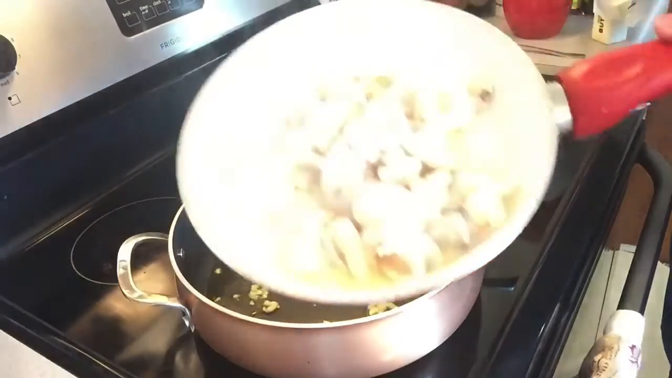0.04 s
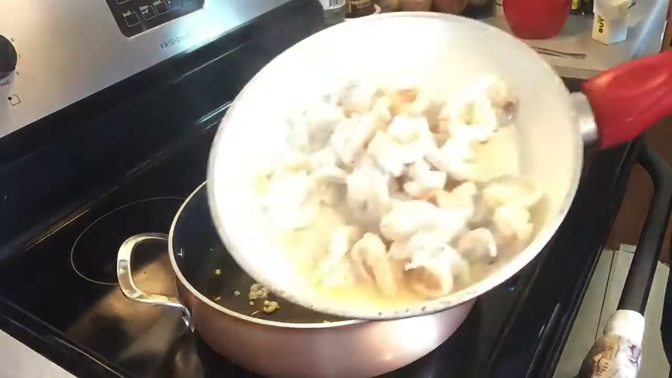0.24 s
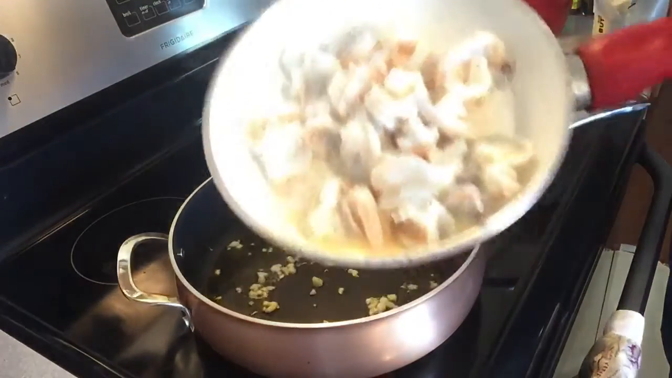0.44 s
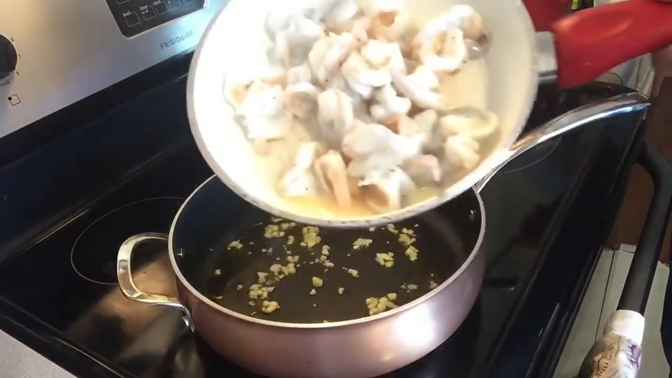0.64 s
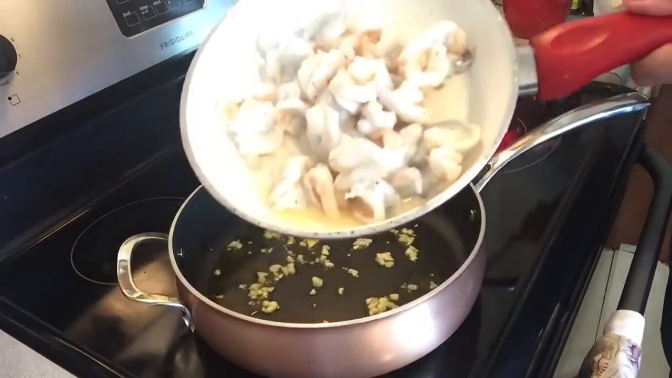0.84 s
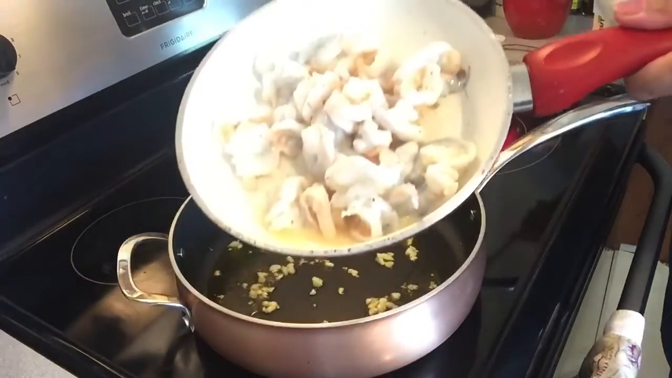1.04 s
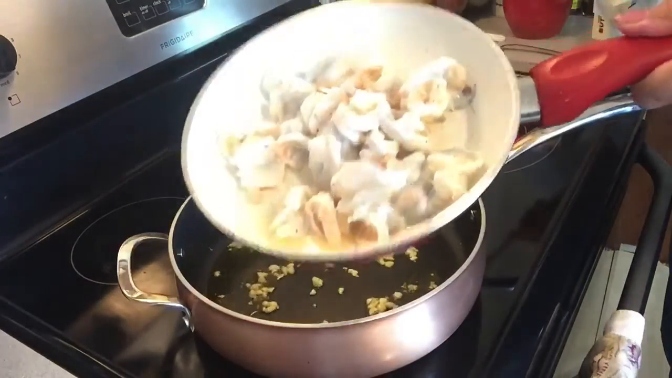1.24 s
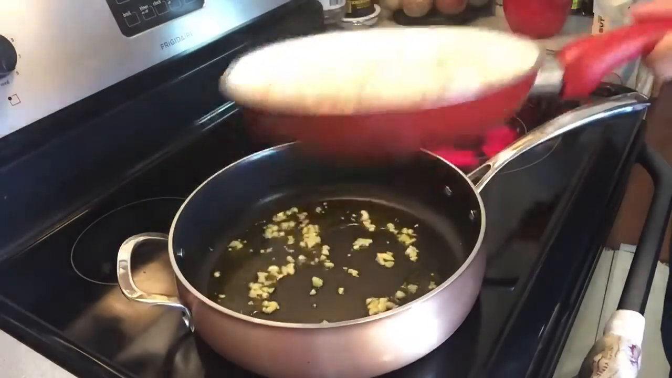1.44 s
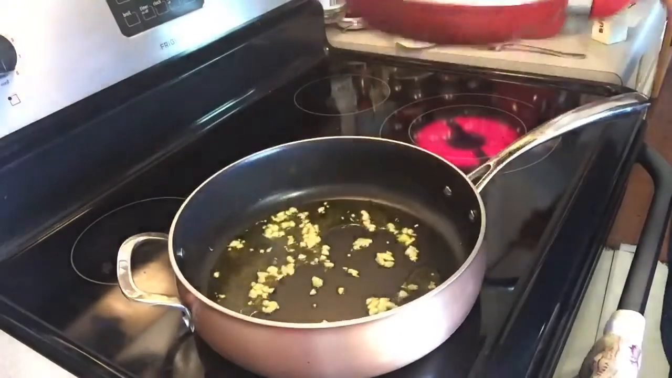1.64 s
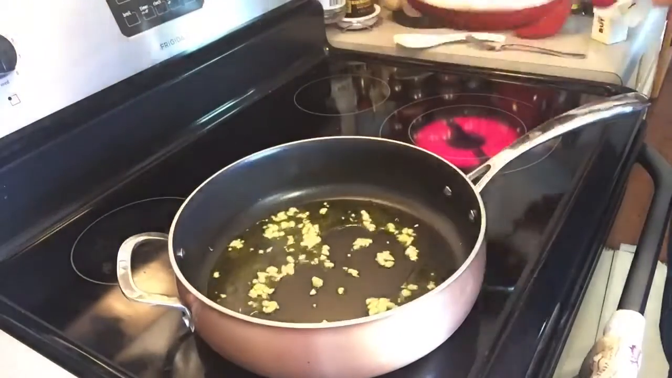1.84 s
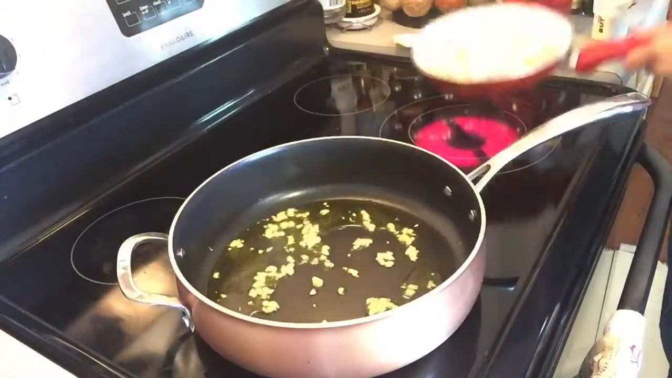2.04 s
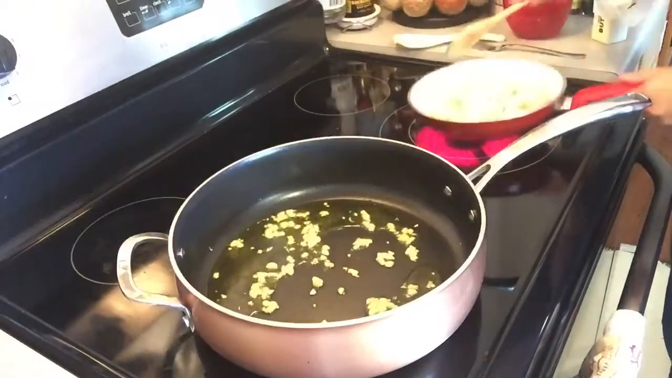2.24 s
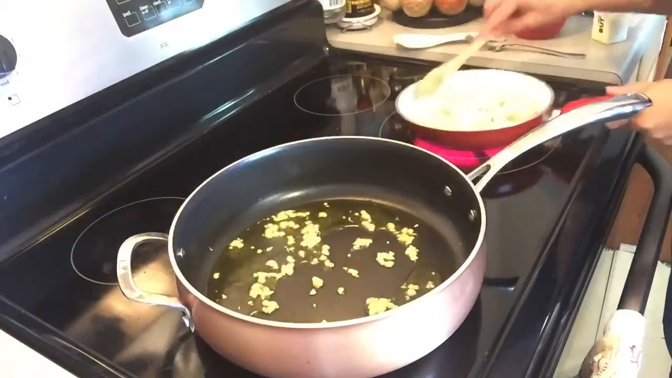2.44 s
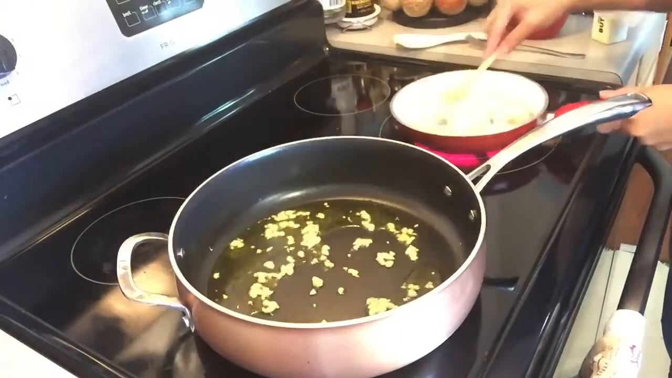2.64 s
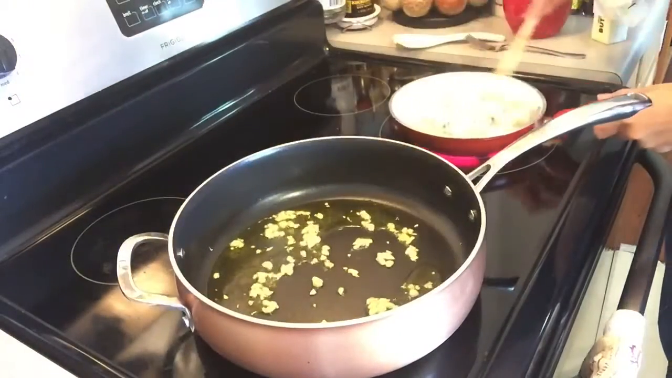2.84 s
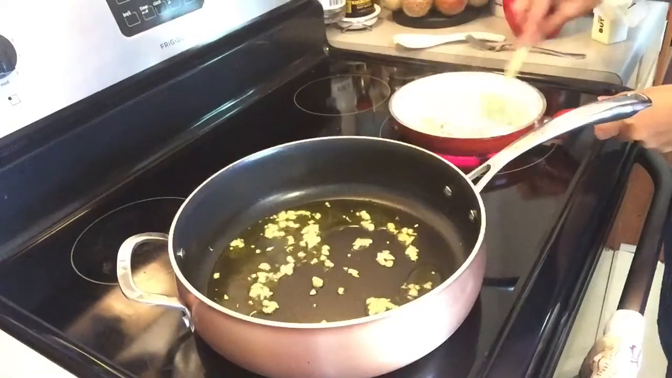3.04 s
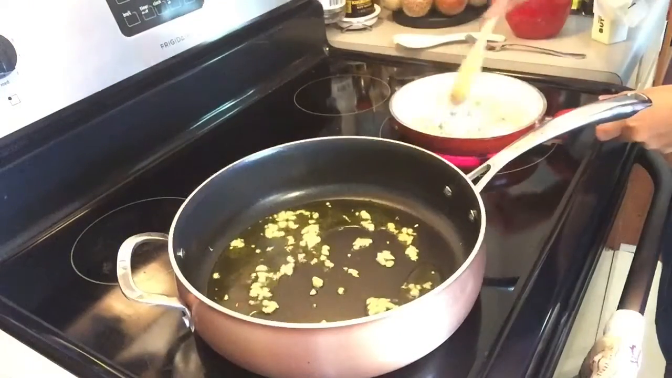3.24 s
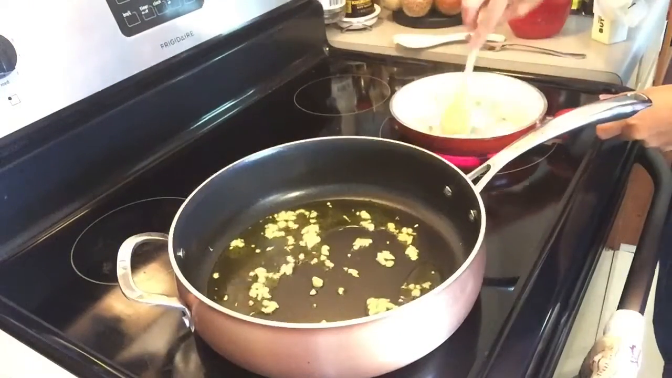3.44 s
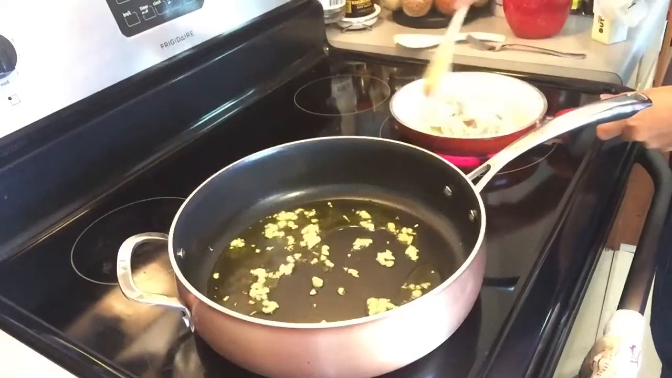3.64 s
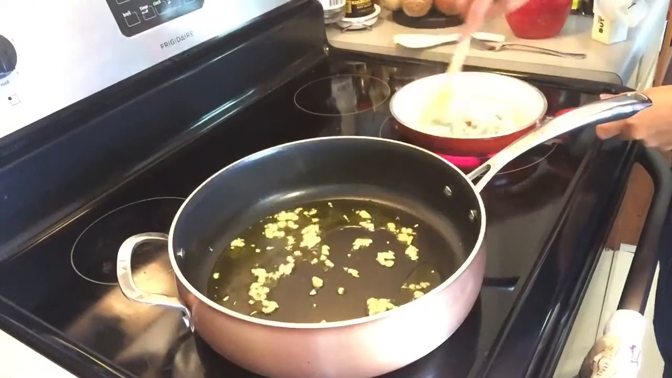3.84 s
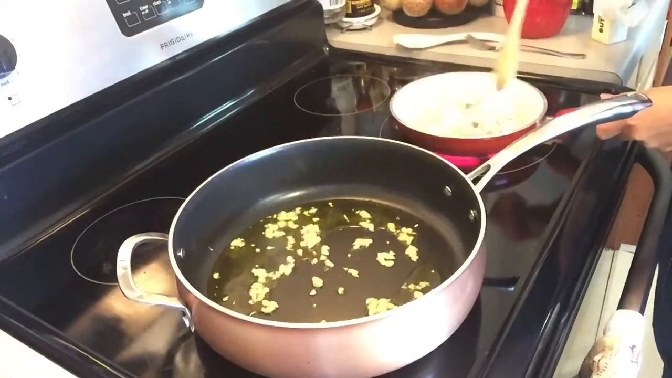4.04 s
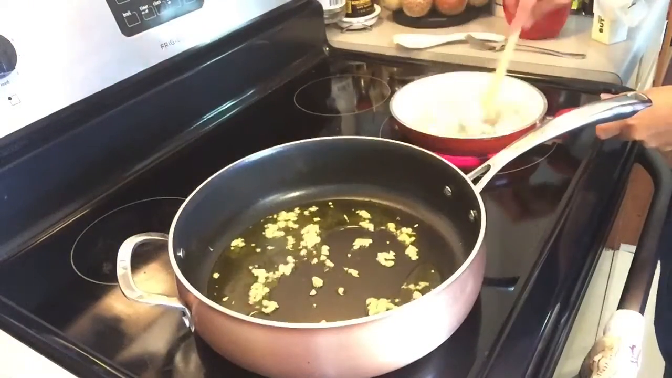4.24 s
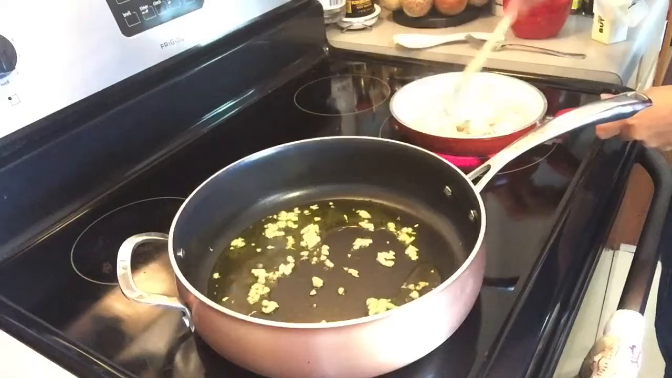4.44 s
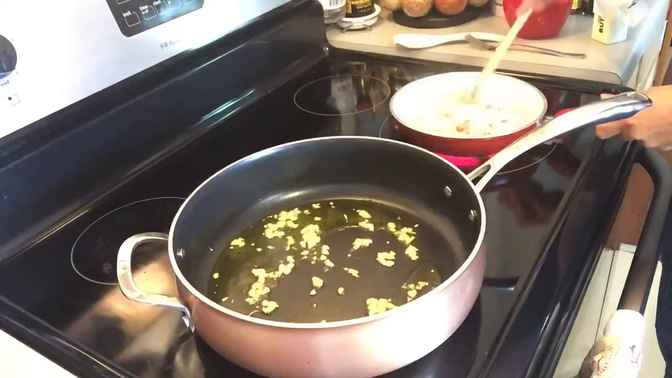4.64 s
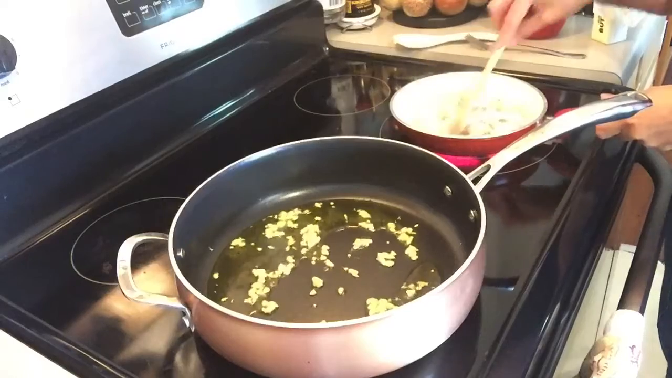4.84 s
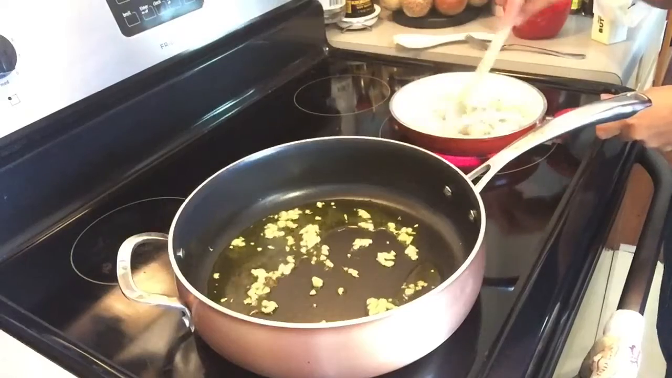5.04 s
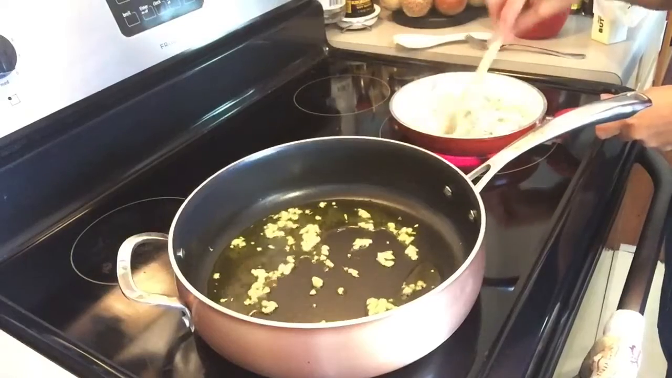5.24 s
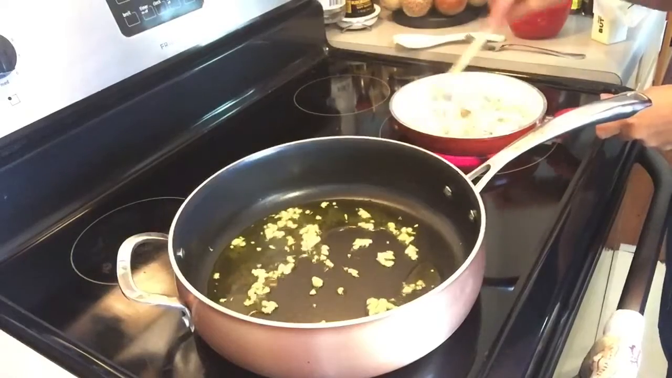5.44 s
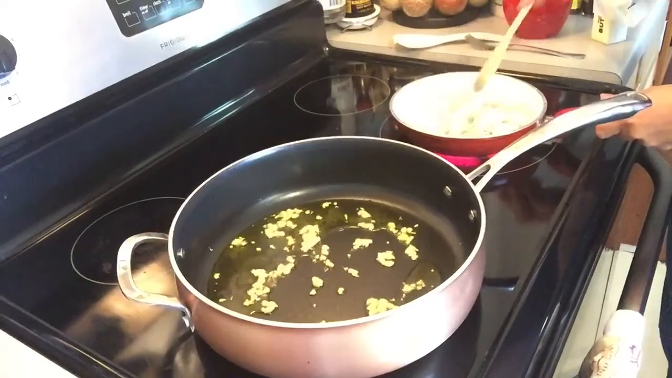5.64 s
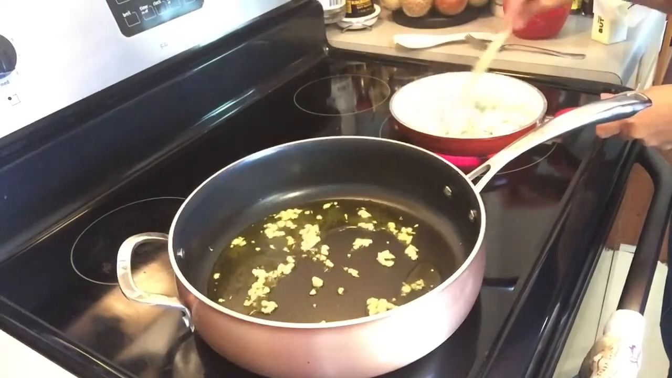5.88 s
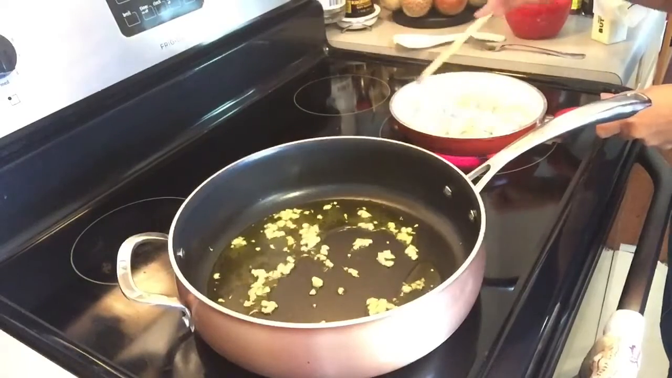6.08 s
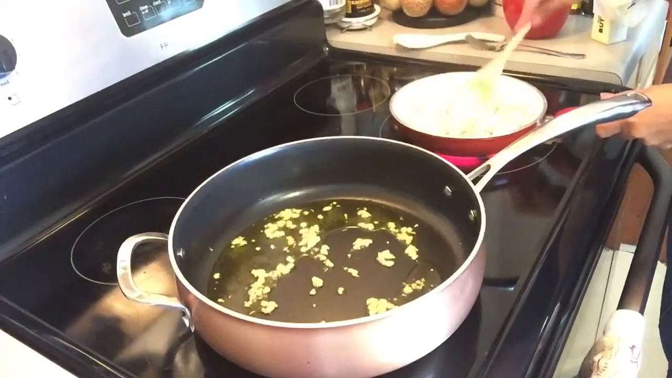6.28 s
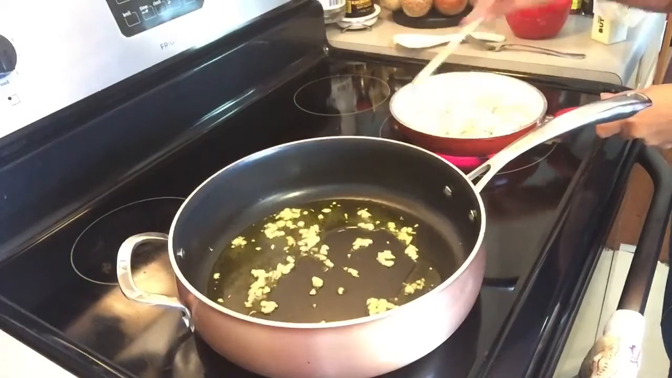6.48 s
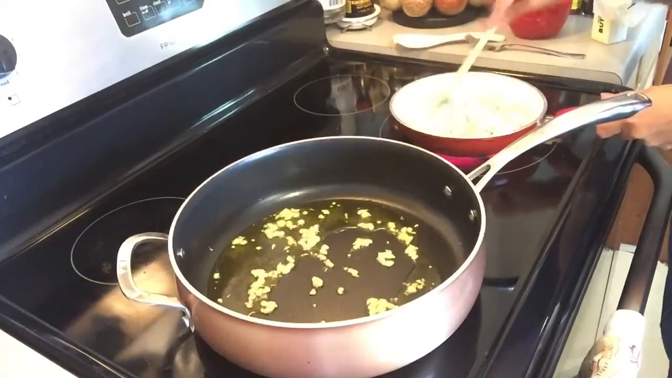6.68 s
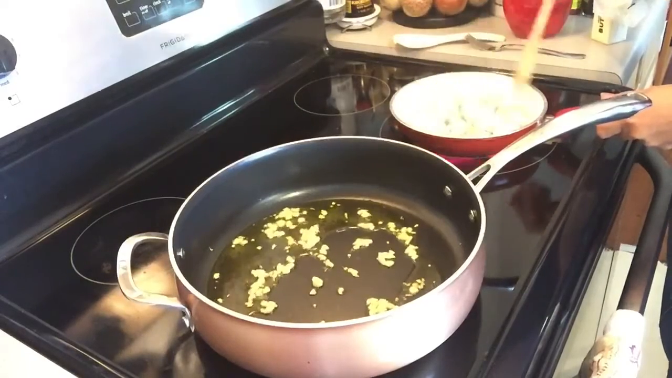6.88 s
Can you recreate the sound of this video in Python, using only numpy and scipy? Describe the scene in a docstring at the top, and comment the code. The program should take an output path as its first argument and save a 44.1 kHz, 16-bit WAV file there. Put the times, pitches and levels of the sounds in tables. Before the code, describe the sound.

Faint oil sizzle in a home kitchen, one loud double clunk of a pan set down, then scattered wooden knocks and soft wet stirring.

```python
"""A small frying pan of shrimp is set down on a glass cooktop and stirred with a wooden spatula.
Each knock excites damped modes of the loaded pan and of the hollow stove top; the kitchen reverberates.
Wet slips rustle as random grains, and garlic sizzles faintly in oil in a nearer pan as shaped noise.
The stove hums as a wavering sine over a soft rush of room noise. One microphone, close by."""
import sys
import numpy as np
from scipy import signal
from scipy.fft import rfft, irfft
from scipy.io import wavfile
from scipy.ndimage import uniform_filter1d

SR = 44100
rng = np.random.default_rng(int(sys.argv[2]) if len(sys.argv) > 2 else 0)


def generate_wav(sig):
    """Save sig (samples, or channels by samples) to the path in sys.argv[1] as 16-bit PCM at SR."""
    pcm = np.round(np.clip(np.atleast_2d(sig).T, -1, 1) * 32767).astype(np.int16)
    wavfile.write(sys.argv[1], SR, pcm)


N = 304863

# modes of the pan, damped by its food: mode_hz, width_hz, relative level_db
PAN_MODES = [(444, 39, 0), (498, 26, 1.5), (664, 46, 4.5), (741, 32, 7), (753, 22, 7.5), (886, 17, 4),
             (1030, 19, -11.5), (1133, 37, 5.5), (1200, 50, -1.5), (1274, 39, -1.5), (1400, 100, 0.5),
             (1488, 15.5, 4), (1564, 34, -4.5), (1710, 57, -1), (1890, 64, -6), (2007, 140, -0.5),
             (2336, 22, 0.5), (2434, 31, 1), (2630, 53, -22), (2835, 78, -4), (2890, 34, -20),
             (3190, 22, -6), (3560, 100, -4), (4120, 74, 2.5), (4590, 68, -4.5), (5400, 68, -11),
             (5480, 62, -1), (6900, 160, 2.5)]


def from_db(db):
    """Decibels to an amplitude ratio."""
    return 10 ** (np.asarray(db) / 20)


def rms_one(x):
    """Normalise the effective (root-mean-square) value to 1."""
    return x / np.sqrt(np.mean(x ** 2) + 1e-20)


def at_hz(points, hz):
    """A table of (hz, value) rows interpolated on a log-frequency axis."""
    points = np.array(points)
    return np.interp(np.log(hz + 1e-3), np.log(points[:, 0]), points[:, 1])


def butter(x, hz, kind, order=2):
    """Butterworth filter: maximally flat passband; its edges are kept between 10 Hz and 0.45 SR."""
    edges = np.clip(hz, 10, .45 * SR)
    return signal.sosfilt(signal.butter(order, edges, kind, fs=SR, output="sos"), x)


def coloured(x, spectrum):
    """Spectral shaping: a steady sound weighted by a (hz, level_db) table; rms 1."""
    gain = from_db(at_hz(spectrum, np.fft.rfftfreq(N, 1 / SR)))
    return rms_one(irfft(rfft(x) * gain, N))


def drift(rate):
    """Slow random fluctuation with rms 1: straight lines between chance values, `rate` of them a second."""
    knots = rng.standard_normal(1000)
    return rms_one(np.interp(np.arange(N) / SR * rate, np.arange(len(knots)), knots))


def swell(middle_s, length_s):
    """Gaussian envelope: a smooth rise and fall of height 1."""
    return np.exp(-(2 * (np.arange(N) / SR - middle_s) / length_s) ** 2)


def resonance(x, hz, width):
    """Damped oscillator: a two-pole resonance with gain 1 at its peak; width in Hz."""
    r = np.exp(-np.pi * width / SR)
    zeros = np.array([1, 0, -1]) * (1 - r * r) / 2
    poles = [1, -2 * r * np.cos(2 * np.pi * hz / SR), r * r]
    return signal.lfilter(zeros, poles, x + 1e-18)


def body(x, modes, spread_db):
    """Modal superposition: parallel modes of alternating sign share each excitation a little differently."""
    chance_db = rng.standard_normal(len(modes)) * spread_db
    total = 0
    for k, (hz, width, db) in enumerate(modes):
        total = total + (-1) ** k * from_db(db + chance_db[k]) * resonance(x, hz, width)
    return total


def burst(t60, rise_s=1e-5, even_hz=45, size=SR * 2 // 3, count=4):
    """High modal density: countless modes or reflections merge into dying noise, even in spectrum, energy 1."""
    t = np.arange(1, size + 1) / SR
    fade = from_db(-60 * t / t60) * (1 - np.exp(-(t / rise_s) ** 2)) + 1e-9
    x = rng.standard_normal(size) * fade
    # level the spectrum and restore the fade by turns
    for _ in range(count):
        spectrum = rfft(x)
        power = uniform_filter1d(np.abs(spectrum) ** 2, max(1, round(even_hz * size / SR)))
        x = irfft(spectrum / np.sqrt(power + 1e-20), size)
        x = fade * x / np.sqrt(np.abs(uniform_filter1d(x ** 2, size=256)) + 1e-12)
    return x / np.sqrt(np.sum(x ** 2))


def grains(per_s, spread_db):
    """Random impulse train: tiny pops of either sign at chance times, uneven by spread_db; rms 1."""
    sizes = from_db(spread_db * np.minimum(rng.exponential(1, N), 5)) * rng.choice([-1, 1], N)
    return rms_one(sizes * (rng.random(N) < per_s / SR))


def add(out, s, x):
    """Linear superposition of a sound that starts at s seconds."""
    start = round(s * SR)
    out[start:start + len(x)] += x[:N - start]


def knocks(dense_db=-3.0, dense_t60=0.073, crack_db=-15.5, crack_t60=0.08, crack_hz=5500,
           stove_spread_db=-24.0, push_db=0.0, tap_db=-11.5):
    """Impact excitation: wood or cooktop meets the pan, a dry tap and short ring over the stove's thump."""
    # knocks of pan and spatula; the spot struck favours one range of the pan's modes,
    # a second above it, and one of the stove top's; levels are relative:
    # start_s, pan_db, contact_cutoff_hz, spot_hz, spot_lift_db, upper_lift_db, stove_db, stove_range_hz
    knock_rows = [(2.4126, -15, 1900, 1170, 7, 3.5, -19, 352), (2.5003, 3.5, 5840, 1810, 10, 6, 12.5, 124),
                  (2.506, -1.5, 2980, 636, 11, 9.5, 17.5, 378), (2.728, -18, 1020, 520, 4, 5, 9, 133),
                  (2.759, -19, 603, 397, 8, 6, 5.5, 74), (3.393, -16, 2300, 850, 14, 1.5, 2, 313),
                  (4.530, -4.5, 2600, 1340, 9, 0.5, 5, 194), (5.1324, 1.5, 2880, 1410, 10, 7.5, 12, 163),
                  (5.1411, -7.5, 2470, 740, 11, 14.5, -13, 222), (5.796, -1, 3000, 1420, 7.5, 4, 12, 223),
                  (6.131, -10, 2010, 530, 12.5, 3, -8.5, 170), (6.179, -26, 1200, 500, 1, -5, -7, 160)]
    # modes of the hollow stove top: mode_hz, width_hz, relative level_db
    stove_modes = [(44.8, 25, -15), (73.4, 27, -7.5), (98, 38, -13), (141.7, 28, 9), (175.5, 30, 5),
                   (232, 33.3, 5), (244.6, 24.6, 6.5), (318.7, 19.8, 9.5), (331, 86, 6.5), (393.6, 47, 1.5)]
    upper_ratio = 1.615  # centre of the upper range over the spot's
    spot_width, stove_width = .26, 0.73  # width of a favoured range over its centre

    out = np.zeros(N)
    for s, pan_db, contact_hz, spot_hz, spot_db, upper_db, stove_db, stove_hz in knock_rows:
        dense = burst(dense_t60)
        blow = signal.unit_impulse(len(dense))
        ring = body(blow, PAN_MODES, spread_db=.8)
        ring = ring + butter(from_db(dense_db) * dense + from_db(tap_db) * blow, 310, "high")
        for hz, lift_db in (spot_hz, spot_db), (upper_ratio * spot_hz, upper_db):
            ring = ring + (from_db(lift_db) - 1) * resonance(ring, hz, spot_width * hz)
        # a soft contact leaves out the high modes; a harder one cracks more strongly
        crack = from_db(crack_db) * (contact_hz / crack_hz) ** 2 * burst(crack_t60)
        add(out, s, from_db(pan_db) * (butter(ring, contact_hz, "low", order=5) + crack))
        # the stove top gives way under the push and booms
        boom = body(blow, stove_modes, spread_db=1.0)
        thump = boom + from_db(push_db) * butter(blow, 338, "low")
        favoured = resonance(thump, stove_hz, stove_width * stove_hz)
        add(out, s, from_db(stove_db) * (from_db(stove_spread_db) * thump + favoured))
    return out


def ticks(ring_width_hz=450, ring_db=6.5, dry_db=-4.5, thin_hz=950):
    """Selective excitation: light touches snap and wake mostly one group of the pan's high modes."""
    # light ticks and wet snaps, levels relative:
    # start_s, level_db, main_ring_hz, brightness_hz, t60_s, first_snap_db
    tick_rows = [(0.185, -18.5, 3100, 4570, 0.076, -2), (3.018, -24.5, 3150, 3870, 0.042, -14),
                 (3.214, -33, 4280, 8000, 0.033, 5), (3.792, -30, 3350, 3460, 0.068, 3.5),
                 (4.867, -26.5, 5960, 7500, 0.039, -1), (4.966, -17.5, 3120, 5500, 0.059, -3),
                 (6.455, -14.5, 3000, 15200, 0.11, -5.5)]
    out = np.zeros(N)
    for s, db, ring_hz, bright_hz, t60, snap_db in tick_rows:
        touch = burst(t60)
        touch = touch + from_db(snap_db) * signal.unit_impulse(len(touch))
        ring = from_db(ring_db) * resonance(touch, ring_hz, ring_width_hz)
        touch = from_db(dry_db) * (touch + ring)
        add(out, s, from_db(db) * butter(butter(touch, thin_hz, "high"), bright_hz, "low"))
    return out


def stirring(ring_db=3.0):
    """Stick-slip friction as random grains: clumps of wet little slips, partly ringing in the pan."""
    # the shrimp slide as the pan is tilted or the spatula pushes them: middle_s, length_s, level_db
    slide_rows = [(.1, 1, -66.5), (4.206, 0.12, -72), (5.39, 0.95, -64.5), (6.177, .25, -60.5),
                  (6.635, .11, -59)]
    # spectrum of the wet rustle: frequency_hz, relative level_db per Hz
    rustle_spectrum = [(150, 4), (380, 6.5), (520, -7), (1500, -0.5), (3200, 7), (5000, 2), (9000, -6.5),
                       (16000, -20)]
    # once the spatula is in the pan, the wet rustle grows steadily
    start_s, start_db, rise_db_per_s = 3.3, -75.5, 3.0

    stirred_s = np.arange(N) / SR - start_s
    steady = from_db(start_db + rise_db_per_s * stirred_s) * (stirred_s > 0)
    slide_power = sum((from_db(db) * swell(s, length_s)) ** 2 for s, length_s, db in slide_rows)
    level = np.sqrt(steady ** 2 + slide_power)
    slips = grains(per_s=2500, spread_db=0.0) * from_db(2.0 * drift(rate=26))
    ring = from_db(ring_db) * body(slips, PAN_MODES, spread_db=2.5)
    return level * coloured(slips + ring, rustle_spectrum)


def sizzle(pops_db=-6.0):
    """Bubble noise: a fine hiss of countless tiny bubbles, with single ones bursting through."""
    # spectrum of the hot oil: frequency_hz, relative level_db per Hz
    oil_spectrum = [(500, -14), (1300, -14.5), (2100, -15.5), (3300, -9.5), (4200, -9), (6500, -5),
                    (7700, -6), (8400, 0), (10200, -1.5), (11500, 0.4), (14000, 1.5), (16000, 0.5)]
    start_db, rise_db_per_s = -55, 0.2546  # the hot oil slowly livens up
    # at first the small pan is held over the oil and screens it, until it is swung away
    screen_loss_db, screen_off_s, swing_s = 2, 1.48, 0.2

    t = np.arange(N) / SR
    screened = np.clip(.5 - (t - screen_off_s) / swing_s, 0, 1)
    level_db = start_db + rise_db_per_s * t - screen_loss_db * screened
    bubbles = rng.standard_normal(N) + from_db(pops_db) * grains(per_s=3500, spread_db=4.0)
    return from_db(level_db) * coloured(bubbles, oil_spectrum)


def near_walls(x):
    """Comb filtering: a few early echoes ripple the spectrum."""
    # stove panel and wall throw the sound back: delay_s, level_db
    echo_rows = [(.0019, -33), (.0043, -27.5), (.0089, -10.5)]
    n = np.arange(N)
    echoes = sum(from_db(db) * np.interp(n - round(delay * SR), n, x, left=0) for delay, db in echo_rows)
    return x + echoes


def kitchen(x, build_s=0.0067):
    """Reverberation by convolution: diffuse reflections build up, then die away, the lows last."""
    # the tail by bands: low_hz, high_hz (limited to 0.45 SR), t60_s, relative level_db,
    # even_hz (width over which its spectrum is even)
    tail_bands = [(49.7, 166, 1, -5.5, 8), (198, 597, 0.54, -5, 10.5), (500, 1130, 0.39, -7, 25),
                  (1080, 3200, 0.37, -7, 44), (3620, 28000, 0.26, -5, 52)]
    response = 0
    for low, high, t60, db, even_hz in tail_bands:
        tail = burst(t60, build_s, even_hz)
        response = response + from_db(db) * butter(tail, [low, high], "band", order=3)
    return signal.fftconvolve(x, response)[:N]


def background(air_db=-65.5):
    """Phase and amplitude modulation: the stove's wavering hum over the soft rush of the room."""
    # spectrum of the room's rush: frequency_hz, relative level_db per Hz
    air_spectrum = [(25, -34), (60, 3), (115, -4.5), (200, -0.5), (300, -7.5), (500, -13), (1000, -13.5),
                    (2100, -12), (3300, -10), (4400, -13.5), (8000, -20)]
    # the hum idles, and swells once
    hum_hz, idle_db, swell_db, swell_s, swell_length_s = 119, -76.0, -67, 5.22, 3.23

    phase = 2 * np.pi * hum_hz * np.arange(N) / SR + .8 * drift(rate=22)
    waver_db = 2.2 * drift(rate=20)
    level = from_db(idle_db) + from_db(swell_db) * swell(swell_s, swell_length_s)
    hum = np.sqrt(2) * np.sin(phase) * level * from_db(waver_db)
    return hum + from_db(air_db) * coloured(rng.standard_normal(N), air_spectrum)


def scene():
    """Superposition: blows sound in the room over the steady sounds; both channels carry the same signal."""
    blows = knocks() + ticks()
    close_sounds = near_walls(stirring() + sizzle())
    mono = blows + kitchen(blows) + close_sounds + background()
    return np.array([mono, mono])


def record(dry):
    """Band limiting: the microphone drops the deepest bass; the top is cut steeply."""
    top = signal.ellip(12, .1, 80, 15850, fs=SR, output="sos")  # cut-off in Hz
    return signal.sosfilt(top, butter(dry, 42, "high"))


dry = scene()
out = record(dry)
generate_wav(out)
```